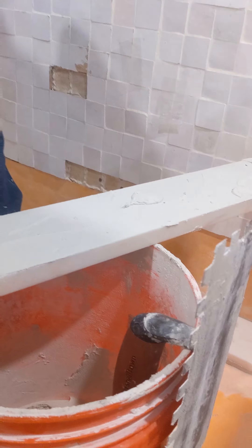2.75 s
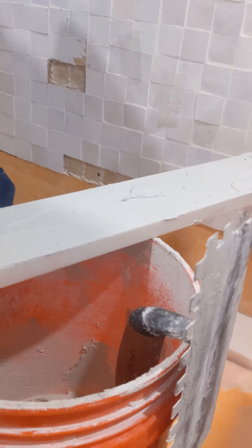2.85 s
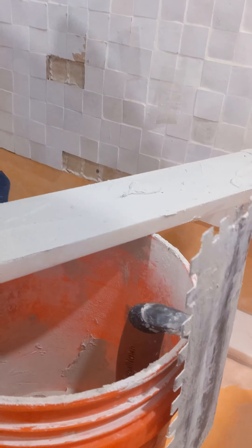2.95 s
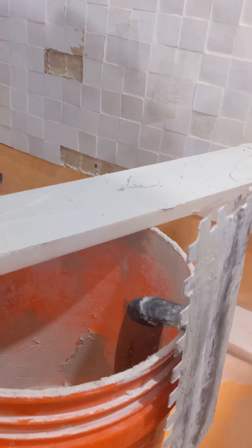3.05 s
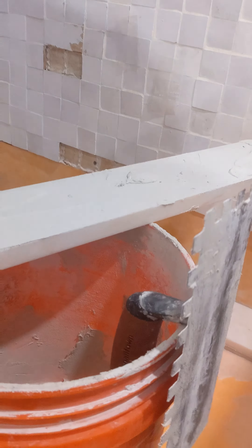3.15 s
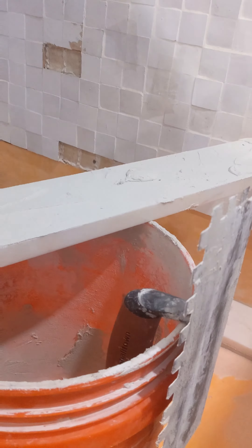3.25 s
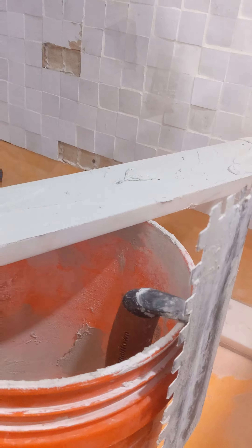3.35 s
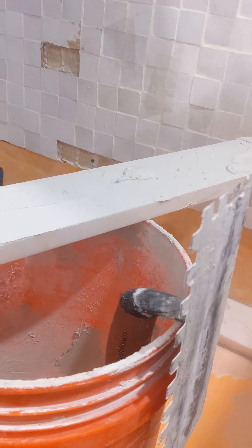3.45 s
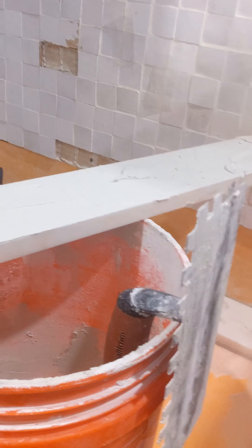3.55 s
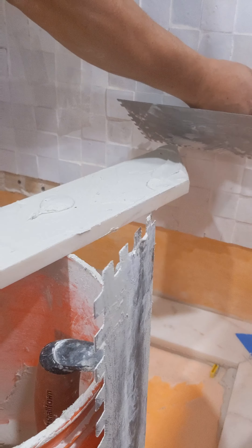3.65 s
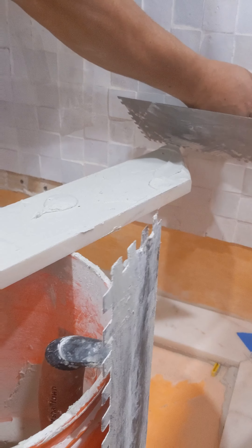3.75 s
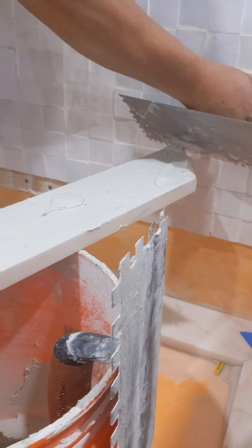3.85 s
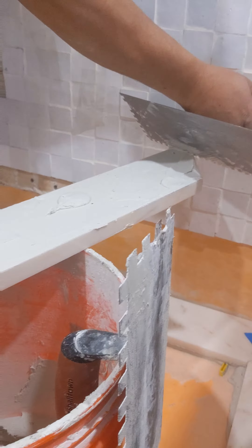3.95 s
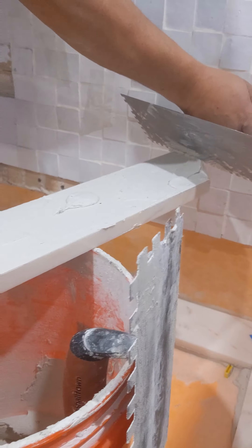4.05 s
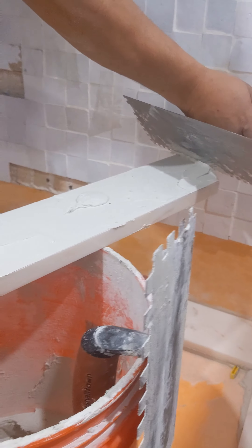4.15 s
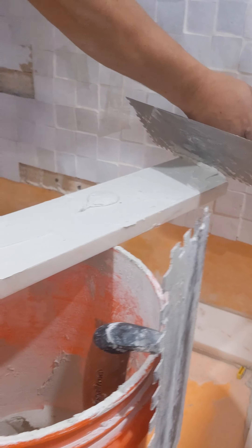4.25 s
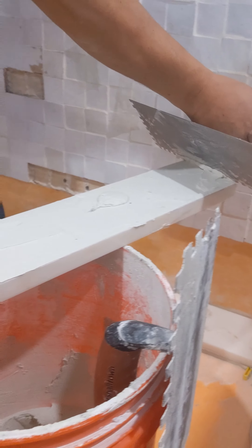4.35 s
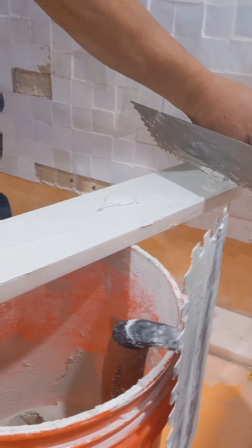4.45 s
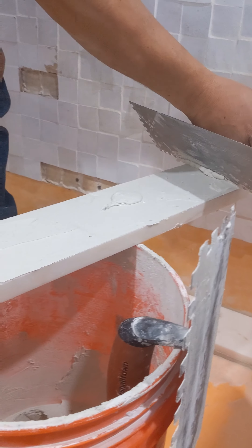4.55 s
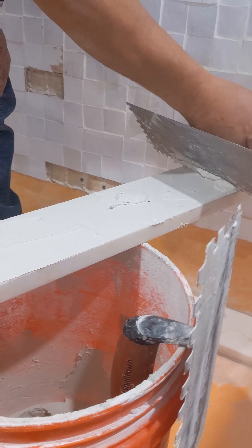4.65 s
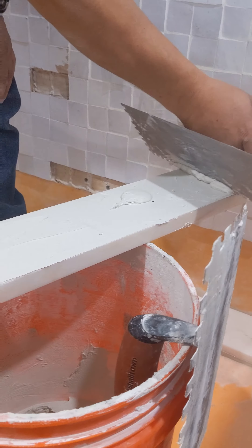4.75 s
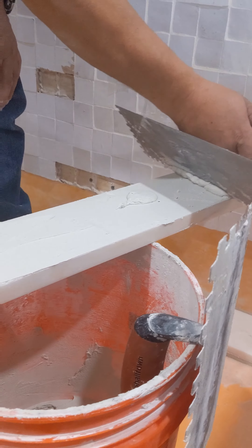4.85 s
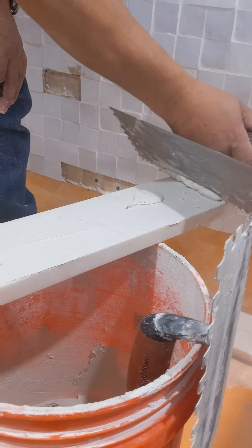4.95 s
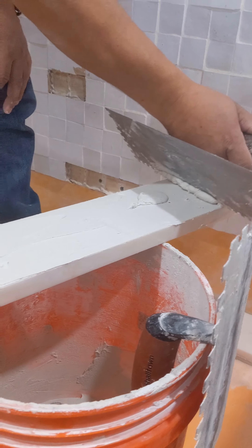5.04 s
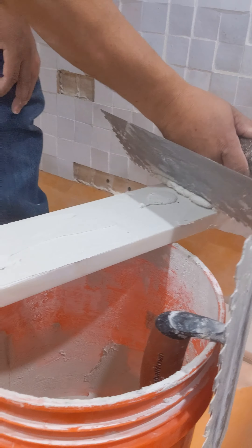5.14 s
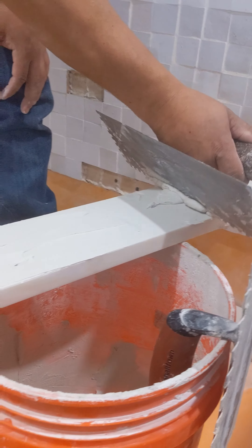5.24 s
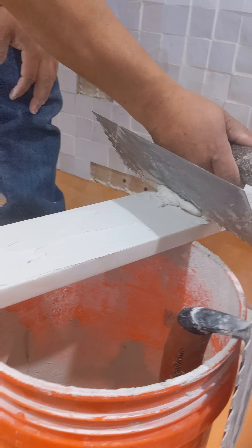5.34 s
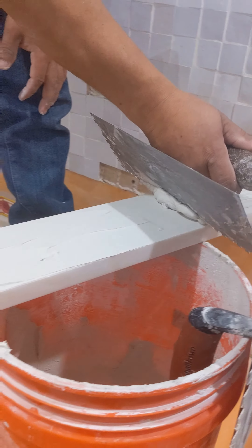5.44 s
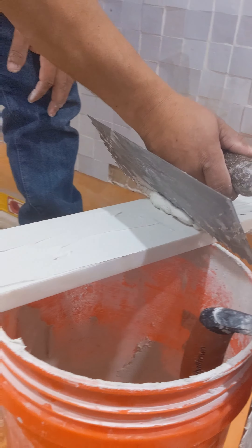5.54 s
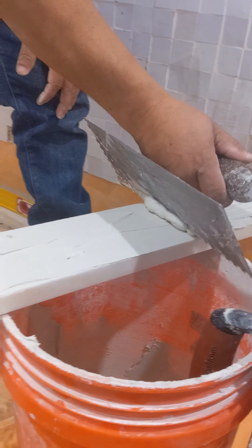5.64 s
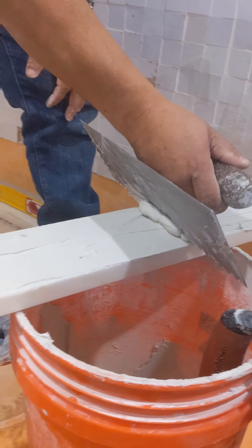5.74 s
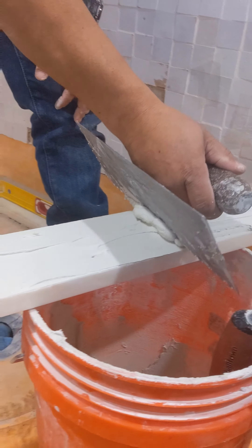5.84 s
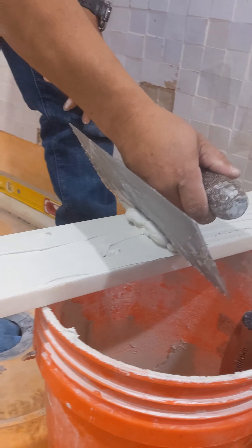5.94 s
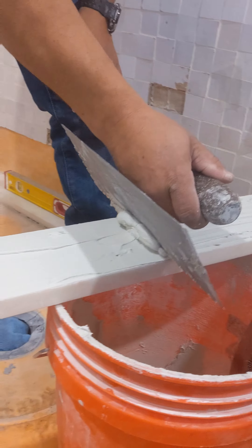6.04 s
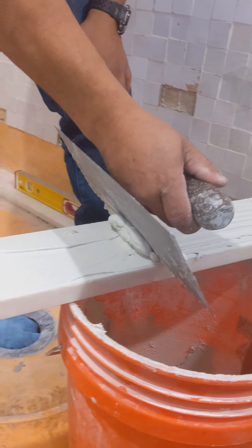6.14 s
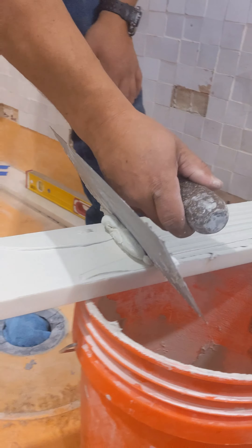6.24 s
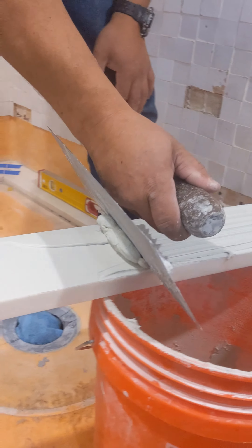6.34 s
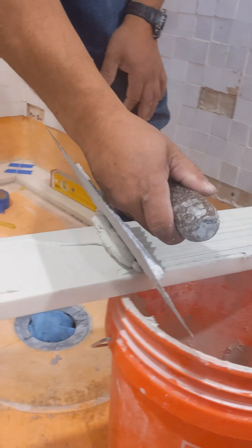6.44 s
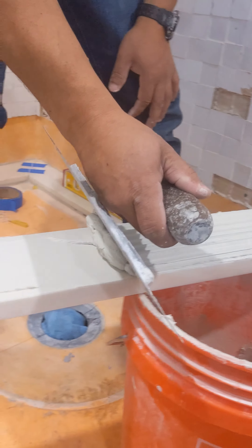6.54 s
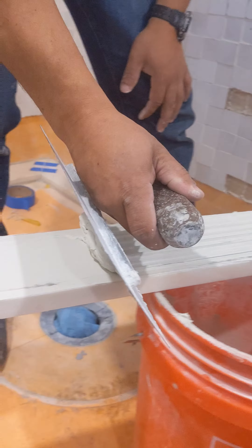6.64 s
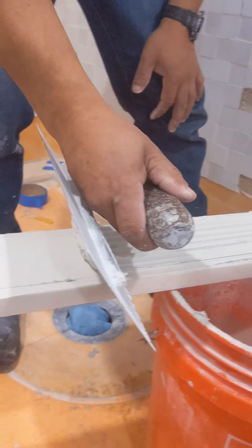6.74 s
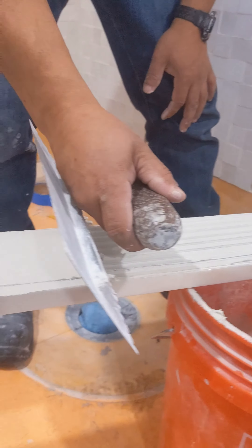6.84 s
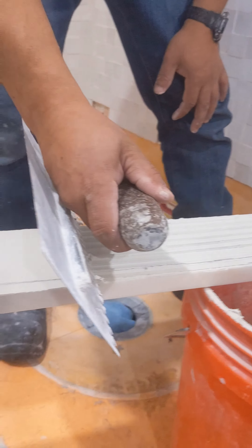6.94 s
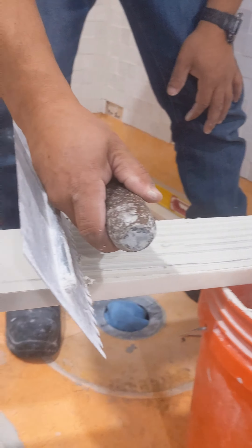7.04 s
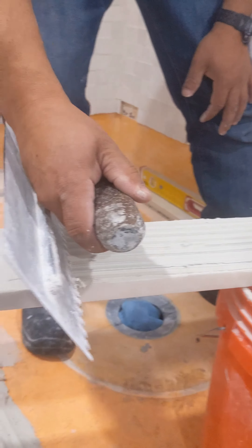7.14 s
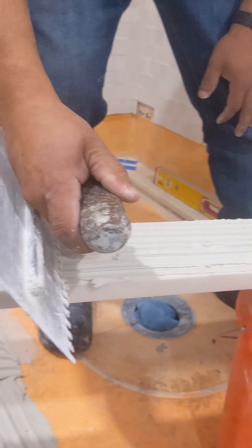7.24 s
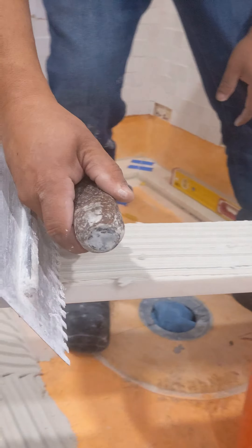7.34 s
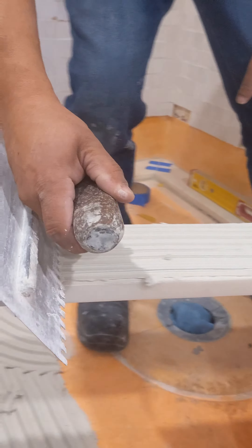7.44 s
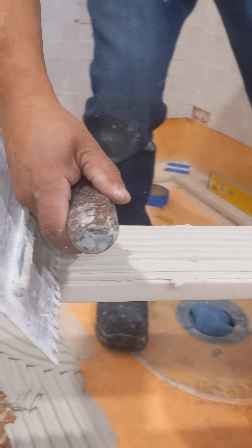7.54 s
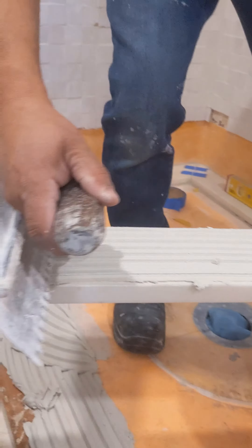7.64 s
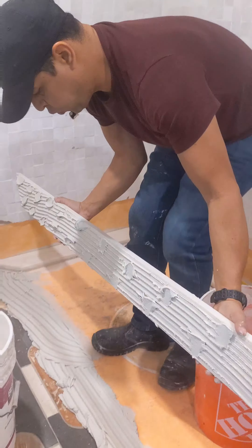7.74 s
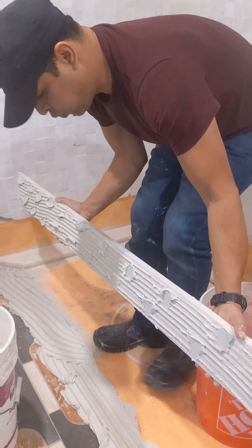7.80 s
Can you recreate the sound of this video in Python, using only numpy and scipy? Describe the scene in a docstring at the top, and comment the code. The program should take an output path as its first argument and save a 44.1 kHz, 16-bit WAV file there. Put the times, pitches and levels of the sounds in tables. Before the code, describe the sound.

A low, steady room rumble with faint hiss runs throughout, in a reflective tiled space, heard close in stereo. At 0 s a loud gritty trowel stroke is just ending, with a thin steel squeal, gone by about 0.2 s. At 0.6 s comes a sharp knock on a plastic bucket; light gritty rubs follow, and a clanking knock at 1.36 s. Around 1.95 to 2.3 s a rasping shove leads into a cluster of knocks, strongest at 2.08 s, hollow and booming, with soft rocking thuds. At 2.9 s a short rasp, squeal and thud. Near quiet follows, with a tiny dropout at 3.6 s. From 3.7 s short scrapes start a long, loud sandy pull, hissing, crunching and ringing blade and board, with brief squeals near 3.95, 5.7 and 6.9 s, smoother and hissier later. It stops dead at 7.67 s; faint rubbing, board sliding and a tiny tap at 7.97 s remain.

```python
"""Trowel and mortar in a tiled room

A steel trowel works gritty mortar: a stroke ends, tool and board knock against a plastic bucket,
then one long pull spreads mortar along the board, and the board slides lightly.
Random sand grains hiss and ring the blade and board; knocks are noise bursts and decaying tones.
Shoves rasp and squeal, light rubs are soft filtered grains, and a low rumble runs throughout."""
import sys
import numpy as np
from scipy import signal
from scipy.fft import rfft, irfft, next_fast_len
from scipy.io import wavfile
from scipy.ndimage import uniform_filter1d, map_coordinates

SR = 44100
rng = np.random.default_rng(int(sys.argv[2]) if len(sys.argv) > 2 else 0)


def file_out(sig):
    """Save sig as 16-bit WAV at sys.argv[1]."""
    # one column per channel
    cols = np.atleast_2d(sig).T
    # limit, then scale
    lim = np.clip(cols, -1, 1)
    pcm = np.round(lim * 32767).astype(np.int16)
    wavfile.write(sys.argv[1], SR, pcm)


N = 400864
TIME = np.arange(N) / SR  # seconds

# Levels in the tables are relative: each sound's function sets the final balance.
# A gesture builds for rise_s, stays for hold_s, then eases off by 20 dB in each fall_s.

# Steady background spectrum: pitch_hz, level_db
AIR_SPECTRUM = [(25, -40), (42, -9.5), (80, -12.5), (117, -1), (149, -12.5), (185, -3), (249, -8),
                (301, -10.5), (695, -16), (863, -19.5), (1040, -16), (3820, -26), (12200, -34.5),
                (16000, -37)]
# How long the room rings: pitch_hz, t60_s (time to fall by 60 dB)
ROOM_T60 = [(100, 0.62), (1400, 0.34), (4000, 0.3), (9000, 0.24), (16000, 0.24)]
CHANNEL_NULL_HZ = 1020  # diffuse sound is nearly unrelated in the two channels from here up

# Short strokes: start_s, rise_s, hold_s, fall_s, hiss_db, then relative to the hiss:
# coarse_sand_db, first_blade_db, second_blade_db, board_db
STROKES = [(0, 0.00034, 0.0078, 0.023, -10.5, -5, -17, -15, -32),
           (.025, 0.019, 0.012, 0.05, -21, 0, -3, -21, -29),
           (3.721, 0.006, 0.021, 0.11, -20.5, -4.5, 4.5, -17, -6),
           (3.828, 0.0022, 0.0033, 0.01, -11, -30, 0.5, -27, -28)]
# Long pull along the board: time_s, hiss_db, bite_db (how much the edge grinds rather than glides)
PULL = [(3.85, -23.5, -1.5), (3.99, -21.5, -0.5), (4.045, -26, 4), (4.07, -17.5, -2), (4.13, -21, 1),
        (4.37, -25, 2), (4.64, -20.5, -1), (4.88, -18.5, -1.5), (5.1, -19, 1.5), (5.12, -19, -0.5),
        (5.32, -21, 2), (5.36, -19, -2.5), (6.52, -20, -4), (6.57, -19.5, -8), (6.64, -21, -4.5),
        (6.77, -20.5, -3), (6.99, -17.5, -5), (7.39, -19, -6), (7.44, -16.5, -11), (7.59, -19, -6),
        (7.66, -16, -7.5)]
PULL_START_S, PULL_RISE_S, PULL_HOLD_S, PULL_FALL_S = 3.838, 0.005, 3.82, 0.006
PULL_DB = 1  # added to the levels in PULL
# What the bite drives; rows are coarse sand, first blade mode, second blade mode, board:
# level_db (relative to the hiss), slope_db_per_db (per dB of bite)
BITE_LAW = [(-4, 0.55), (0.5, 1.1), (-8.5, 1.07), (-6.5, 1.05)]
BED_IN_DB, BED_IN_S = -4.5, 0.32  # the edge first rides on wet paste, then beds into the sand
LEAN_DB_PER_S = -0.37  # the first blade mode fades as the trowel leans over
SWEET_S, SWEET_WIDTH_S, SWEET_DB = 5.65, 0.66, 5.5  # the angle that suits the second mode
MIDSPAN_S, MIDSPAN_WIDTH_S = 5.9, 0.54  # the trowel passes the middle of the board
MIDSPAN_RING_DB, MIDSPAN_BEND_DB = -1.5, 3.5  # there the board rings less and bends more
# Where the trowel lies: time_s, left_lag_samples
BEARING = [(0, 8.8), (4.7, 6.5), (5.7, 4.3), (6.7, 2.5), (7.6, 2.1)]
# Sand spectra: pitch_hz, level_db
FINE_SAND = [(1500, -34), (5500, -12.5), (7500, -5.5), (9800, -2.5), (11300, 1), (12800, -5), (14000, -5),
             (16000, -12)]
COARSE_SAND = [(30, -29.5), (120, -23), (500, -14), (900, -6.5), (1150, 2), (2300, -0.5), (2900, -0.5),
               (4300, 2.5), (5600, -0.5), (6700, -3), (8500, -8.5), (16000, -38.5)]
# Resonances that depend on where the edge bears: pitch_hz, width_hz, level_db, best_s (loudest moment)
BLADE_FIRST = [(1225, 85, -4, 5.6), (1285, 20, -1.5, 4.9), (1330, 20, 0.5, 5), (1432, 64, 0, 5.2),
               (3660, 400, -4.5, 2.2)]
BLADE_SECOND = [(1483, 42, -8, 6.5), (1609, 81, -2.5, 4.8), (1693, 38, -2, 6.7), (1772, 69, -4.5, 5.22),
                (2395, 130, -9, 3.9)]
BOARD = [(297, 34, -7.5, 4.0), (406, 70, -2, 7.2), (580, 75, -4, 7.6), (654, 24, 1, 4.4),
         (695, 150, 5.5, 7.12), (830, 19, 3, 3.8), (877, 96, 0.5, 5.48), (1076, 110, -0.5, 5.73)]
# High resonances of the steel: pitch_hz, width_hz, level_db
BLADE_HIGH = [(9000, 630, -5.5), (10660, 300, -5), (11540, 810, 2), (11900, 140, 1.5), (12700, 350, -4),
              (14650, 226, -4), (15270, 200, -10.5)]
# Slow bending of the board: pitch_hz, width_hz, level_db
BOARD_BENDING = [(102, 27, -8.5), (142.8, 10, 4.5), (203, 33, 2.5), (233, 18, -9), (291.5, 9.8, 3)]

# Hard, short shoves: start_s, rise_s, hold_s, fall_s, rasp_db, ring_db
SHOVES = [(1.95, 0.11, 0.03, 0.084, -19.5, -36), (2.888, 0.013, 0.016, 0.039, -21, -28),
          (2.92, 0.02, 0.028, 0.08, -36, -26)]
# Rasp spectrum of a shove: pitch_hz, level_db
SHOVE_SPECTRUM = [(150, -45), (250, 2), (282, -1.5), (698, -15), (971, -9), (1080, -17), (1280, -6.5),
                  (1610, -7.5), (2250, -11), (3000, -9.5), (4120, -15.5), (6500, -21), (11900, -24.5),
                  (16000, -30)]
# What a shove rings: pitch_hz, width_hz, level_db
SHOVE_RING = [(750, 36, -1.5), (1270, 25, -2), (1514, 20, 3), (1760, 35, -3), (2130, 20, -2.5),
              (2337, 25, -1)]
# Squeals of the steel: start_s, rise_s, hold_s, fall_s, level_db, pitch_hz
SQUEALS = [(0, .013, .066, 0.11, -30, 1308), (1.992, .077, .004, .08, -31, 1325),
           (2.908, 0.024, .022, 0.03, -18.5, 1610), (2.963, 0.022, .004, .1, -34, 1380),
           (3.955, .013, .036, .03, -22.5, 1393), (5.67, .017, .027, .03, -22, 1756),
           (6.926, .017, .012, .034, -20.5, 1690), (7.98, .037, 0.033, .05, -49, 1030),
           (8.06, .03, .04, .05, -55, 1210)]

# Light rubs and dabs of the tool: start_s, rise_s, hold_s, fall_s, level_db
RUBS = [(.547, 0.0033, 0.038, 0.0083, -42.5), (.72, 0.3, .05, 0.087, -50), (1.08, 0.095, 0.017, 0.015, -38),
        (1.306, 0.018, .003, 0.018, -30.5), (1.58, 0.049, 0.0044, .03, -37), (1.89, .002, .003, .008, -40),
        (2.53, .001, .002, .005, -39), (3.26, 0.016, 0.1, 0.045, -52.5),
        (3.374, 0.0063, 0.01, 0.089, -48.5), (7.695, 0.013, 0.27, 0.13, -41.5)]
# Spectrum of a rub: pitch_hz, level_db
RUB_SPECTRUM = [(47, -29), (80, -7.5), (203, -4.5), (802, -16), (1200, -11), (1460, -9), (2540, -12.5),
                (7530, -22), (11500, -18.5), (15000, -23.5), (16000, -46)]
# Light slides of the board as it is picked up: start_s, rise_s, hold_s, fall_s, level_db
SLIDES = [(7.695, 0.021, 0.19, 0.14, -41.5)]
# What rings as it slides: pitch_hz, width_hz, level_db
SLIDE_RING = [(335, 66, -2.5), (757, 46, -5), (1310, 120, -4), (1830, 200, -6)]

# Knocks: start_s, thud_db, thud_centre_hz, blade_ring_db, blade_ring_centre_hz,
# clack_db (hollow), clank_db (steel), tick_db, chatter_s, left_minus_right_db
KNOCKS = [(0.581, -58, 302, -47, 1200, -30, -50, -35, 0.0053, 12),
          (0.591, -18.5, 493, -30, 1150, -27, -19, -20, 0.0013, -0.5),
          (1.359, -20, 152, -31, 1500, -29.5, -16, -20.5, 0.0062, -5),
          (1.391, -34, 170, -42, 2200, -36.5, -24.5, -30, 0.058, 3),
          (1.948, -25.5, 190, -19.5, 1820, -38, -19, -24, 0.0054, 1.5),
          (1.995, -30, 290, -40, 1400, -27.5, -23, -33, 0.0097, 4),
          (2.035, -36, 110, -34, 1400, -25, -22, -39, 0.0066, 3),
          (2.078, -13.5, 250, -27, 1340, -15.5, -16, -19.5, 0.0039, 0.5),
          (2.229, -27.5, 230, -31, 1940, -28, -22, -27, 0.0057, 1),
          (2.243, -27, 105, -33, 1940, -30, -29, -30, 0.0046, 3),
          (2.323, -24, 152, -43, 1700, -45, -34.5, -38.5, 0.023, 3),
          (2.903, -32, 300, -30.5, 1500, -29.5, -29, -29, 0.0091, 11.5),
          (2.925, -22.5, 258, -31, 2200, -38, -40, -23, 0.053, 4),
          (3.83, -53, 200, -40, 1330, -41, -25.5, -24.5, 0.017, 4),
          (7.965, -39, 215, -47, 1800, -38, -50, -36, 0.021, 0)]
KNOCK_LAG = 4  # samples by which the sharp contact reaches the left channel first
# Soft thuds of the bucket rocking after a knock: start_s, level_db, centre_hz, left_minus_right_db
ROCKS = [(2.134, -15.5, 210, 0), (2.176, -18, 120, 3), (2.262, -22.5, 149, 1.5), (2.953, -22.5, 240, 1)]
# Bucket and board ringing together: pitch_hz, level_db, t60_s
BODY = [(86, 0.5, 0.23), (101, 3, 0.12), (119.4, -2, 0.18), (150.6, 5, 0.15), (200.8, 1, 0.2),
        (244.6, -3, 0.13), (295.6, -4.5, 0.29), (409, -22, 0.16), (468, -15.5, 0.41), (657, -11.5, 0.29),
        (796, -4, 0.2)]
# The struck steel blade: pitch_hz, level_db, t60_s
BLADE_STRUCK = [(1120, -4, .22), (1265, -7.5, .2), (1504, -2.5, 0.22), (1620, -2.5, .11), (1744, 2.5, .09),
                (1927, -1.5, .11), (2130, -4, .09), (2350, -10, .14)]
# Colours of a knock: pitch_hz, level_db
CLACK = [(120, -28), (380, -0.5), (463, -4), (560, -2.5), (700, -2.5), (786, 4.5), (900, -7), (1150, -5),
         (1600, -14), (5000, -48)]
CLANK = [(500, -8), (1000, 0), (1500, 6.5), (1900, 5), (2400, -1.5), (3200, 2.5), (3900, -11.5),
         (8000, -35)]
TICK = [(1500, -2.5), (3500, 0), (5500, -2), (7500, -5.5), (11500, -3.5), (14000, -12), (16000, -23)]

# The sound drops out briefly: start_s, end_s, fade_s
DROPOUTS = [(3.604, 3.701, 0.0083), (7.67, 7.686, 0.024)]
TOP_HZ = 15550  # the treble is cut steeply above this


def undb(db):
    """Turn decibels into a plain gain."""
    return 10 ** (np.asarray(db) / 20)


def unit(x):
    """Scale to an rms level of 1."""
    return x / np.sqrt(np.mean(x ** 2))


def on_log(hz, points):
    """Read (pitch, value) points on a log-frequency axis."""
    f, value = np.transpose(points)
    return np.interp(np.log(np.maximum(hz, 1)), np.log(f), value)


def colour(x, points, size=4096):
    """Filter with the given spectrum; it never sounds early and its response has energy 1."""
    gain = undb(on_log(np.fft.rfftfreq(size, 1 / SR), points))
    # folding the cepstrum makes the filter minimum phase
    cepstrum = irfft(np.log(gain))
    cepstrum[1:size // 2] *= 2
    cepstrum[size // 2 + 1:] = 0
    response = irfft(np.exp(rfft(cepstrum)))
    return signal.oaconvolve(x, response / np.linalg.norm(response))[:len(x)]


def ring(x, modes):
    """Drive a set of resonances, each at its own level and with alternating sign."""
    total = 0
    for k, (hz, width, db) in enumerate(modes):
        tone = unit(signal.lfilter(*signal.iirpeak(hz, hz / width, SR), x))
        total = total + (-1) ** k * undb(db) * tone
    return unit(total)


def walk(rate):
    """Wander between random values, `rate` new ones a second, with an rms of 1."""
    knots = rng.standard_normal(4096)
    return unit(np.interp(TIME * rate, np.arange(len(knots)), knots))


def gesture(start, rise, hold, fall):
    """Gain of a touch that builds, holds and eases off."""
    age = TIME - start
    return np.clip(age / rise, 0, 1) ** 2 * undb(-20 * np.clip((age - rise - hold) / fall, 0, 10))


def touches(rows):
    """Summed gain of a table of gestures."""
    return sum(undb(db) * gesture(*timing) for *timing, db in rows)


def passing(centre, width):
    """A smooth bump in time, 1 at its centre."""
    return np.exp(-((TIME - centre) / width) ** 2)


def follow(rows, column):
    """One column of a table, joined by straight lines in time."""
    rows = np.array(rows)
    return np.interp(TIME, rows[:, 0], rows[:, column])


def diffuse(size):
    """Noise from all directions: partly alike in the bass, nearly unrelated in the treble."""
    likeness = 0.8 * np.sinc(np.fft.rfftfreq(size, 1 / SR) / CHANNEL_NULL_HZ)
    mid, side = (irfft(rfft(rng.standard_normal(size)) * np.sqrt((1 + sign * likeness) / 2), size)
                 for sign in (1, -1))
    return np.array([mid + side, mid - side])


def tiled_room(first_s=0.0027, early_db=-11, size=24000, count=3):
    """A few early bounces off board and tiles, then dense reflections that die sooner in the treble."""
    hz, t, cells = signal.stft(diffuse(size), SR, nperseg=256)
    t60 = on_log(hz, ROOM_T60)[:, None]
    decay = np.exp(-np.log(1000) * t / t60) / np.sqrt(t60)
    tail = signal.istft(cells * decay, SR)[1]
    # silent until first_s, then fading in
    tail *= np.clip(np.arange(tail.shape[1]) / SR / first_s - 1, 0, 1)
    tail /= np.linalg.norm(tail, axis=1, keepdims=True)
    for lag in rng.integers(60, 400, count):  # samples
        tail[[0, 1], lag + rng.integers(0, 16, 2)] += undb(early_db)
    return tail / np.linalg.norm(tail, axis=1, keepdims=True)


def place(x, room, wet_db):
    """Mix direct sound with its room echo, keeping the power."""
    direct = np.broadcast_to(x, (2, N))
    wet = signal.oaconvolve(direct, room, axes=1)[:, :N]
    return (direct + undb(wet_db) * wet) / np.hypot(1, undb(wet_db))


def roving(x, wet_db):
    """A moving source: the pattern of reflections, and so the colour, keeps changing."""
    out = np.zeros((2, N + 2 * SR))
    step_s = 0.07  # overlapping pieces, each with a fresh room response
    for centre in np.arange(0, 8.3, step_s):
        a, b = max(int((centre - step_s) * SR), 0), int((centre + step_s) * SR)
        part = x[a:b] * np.cos(np.pi / 2 * (TIME[a:b] - centre) / step_s)
        if np.abs(part).max() > 1e-4:
            wet = signal.fftconvolve(part[None], tiled_room(size=12288), axes=1)
            out[:, a:a + wet.shape[1]] += wet
    left = map_coordinates(x, [np.arange(N) - follow(BEARING, column=1)], order=3)
    direct = np.array([left, x])
    return (direct + undb(wet_db) * out[:, :N]) / np.hypot(1, undb(wet_db))


def grit(spread_db, share=0.25):
    """Sand grains snapping past the edge: many small, a few large."""
    at = np.flatnonzero(rng.random(N) < share)  # share of samples that hold a grain
    size_db = spread_db * np.minimum(rng.exponential(size=len(at)), 6)
    grains = np.zeros(N)
    grains[at] = rng.choice([-1, 1], len(at)) * undb(size_db)
    return unit(grains)


def room_air():
    """A steady low rumble with a faint hiss, made of filtered noise that wavers a little."""
    air = np.array([colour(side, AIR_SPECTRUM) for side in diffuse(next_fast_len(N))[:, :N]])
    waver_db = 0.5 * walk(6)
    return unit(air) * undb(-47 + waver_db)


def short_strokes():
    """Drives of fine sand, coarse sand, two blade modes and board, in strokes of steady grip."""
    drives = 0
    for s, rise, hold, fall, db, *grip in STROKES:
        levels = undb(db + np.array([0, *grip]))
        drives = drives + np.outer(levels, gesture(s, rise, hold, fall))
    return drives


def long_pull():
    """The same five drives, changing with bite and angle as the trowel travels the board."""
    force = gesture(PULL_START_S, PULL_RISE_S, PULL_HOLD_S, PULL_FALL_S)
    force = force * undb(PULL_DB + follow(PULL, column=1))
    bite, age = follow(PULL, column=2), np.maximum(TIME - PULL_START_S, 0)
    coarse, first, second, board = (db + slope * bite for db, slope in BITE_LAW)
    paste = BED_IN_DB * np.exp(-age / BED_IN_S)
    coarse = coarse + paste
    first = first + LEAN_DB_PER_S * age
    second = second + 2 * paste + SWEET_DB * passing(SWEET_S, SWEET_WIDTH_S)
    board = board + MIDSPAN_RING_DB * passing(MIDSPAN_S, MIDSPAN_WIDTH_S)
    return force * undb([np.zeros(N), coarse, first, second, board])


def patchy(x, patchy_db, size=512, count=3):
    """The points of contact keep changing, so narrow bands of the scrape flicker on their own."""
    cells = signal.stft(x, SR, nperseg=size)[2]
    flicker = uniform_filter1d(rng.standard_normal(cells.shape), count, axis=0)
    flicker = unit(uniform_filter1d(flicker, count, axis=1))
    return unit(signal.istft(cells * undb(patchy_db * flicker), SR)[1][:N])


def swept_ring(x, modes, swing_db, span_s, drift):
    """Each resonance swells as the edge passes its best spot; all wander slightly in pitch at random."""
    out = 0
    for k, (hz, width, db, best_s) in enumerate(modes):
        swell_db = swing_db * (passing(best_s, span_s) - 1)
        out = out + (-1) ** k * undb(db + swell_db) * ring(x, [(hz, width, 0)])
    out = out / np.linalg.norm(undb([mode[2] for mode in modes]))
    # reading slightly fast or slow shifts the pitch
    return np.interp(TIME + np.cumsum(drift * walk(9)) / SR, TIME, out)


def trowel(room):
    """The edge crushes sand, which hisses and rings the steel blade and the board under it."""
    fine, *grinding = long_pull() + short_strokes()
    lumps = walk(45)  # lumps in the mortar jolt the grinding more than the hiss
    fine = fine * undb(0.31 * lumps)
    coarse, first, second, board = np.array(grinding) * undb(0.35 * lumps)
    # slips come at uneven moments and shake fine and coarse sand together
    shake = undb(0.97 * walk(140))

    fine_scrape = patchy(colour(grit(spread_db=3, share=0.06), FINE_SAND), patchy_db=3)
    steel_hiss = ring(grit(spread_db=5), BLADE_HIGH)
    hiss = fine * (undb(0.5) * fine_scrape + undb(-0.5) * steel_hiss)
    crunch = patchy(colour(grit(spread_db=3.5, share=0.03), COARSE_SAND), patchy_db=2.2)
    rasp = undb(2.5) * coarse * crunch

    first_ring = swept_ring(grit(spread_db=2.5), BLADE_FIRST, swing_db=2, span_s=0.89, drift=0.005)
    second_ring = swept_ring(grit(spread_db=3.5), BLADE_SECOND, swing_db=3, span_s=0.62, drift=0.004005)
    blade = undb(-1) * first * first_ring + undb(7) * second * second_ring

    bending = np.sqrt(fine * board) * undb(MIDSPAN_BEND_DB * passing(MIDSPAN_S, MIDSPAN_WIDTH_S))
    board_ring = swept_ring(grit(spread_db=3, share=0.08), BOARD,
                            swing_db=7.5, span_s=0.96, drift=0.00395)
    wood = undb(3.5) * board * board_ring
    wood = wood + undb(-17.5) * bending * ring(grit(spread_db=3), BOARD_BENDING)
    # keep the deep bass out of the board's ring
    wood = signal.sosfilt(signal.butter(4, 90, "high", fs=SR, output="sos"), wood)

    # sand leans to the left, blade to the right (dB per channel)
    sand = roving(shake * (hiss + rasp), wet_db=7.5) * undb([[0.7], [-0.7]])
    steel = roving(blade, wet_db=7) * undb([[-0.6], [0.6]])
    return sand + steel + place(wood, room, wet_db=1)


def drags(room):
    """Steel shoved over a rough edge rasps and squeals at a ragged pitch."""
    grains = grit(spread_db=3.5, share=0.05)
    ring_gain = touches([(*timing, db) for *timing, _, db in SHOVES])
    partials = ring_gain * ring(grains, SHOVE_RING)
    rasp_gain = touches([row[:-1] for row in SHOVES])
    rasp = rasp_gain * colour(grains * undb(2.2 * walk(200)), SHOVE_SPECTRUM)
    ragged = walk(150) + 1j * walk(150)  # random wobble of strength and phase
    squeal = 0
    for s, rise, hold, fall, db, hz in SQUEALS:
        tone = np.real(ragged * np.exp(1j * 2 * np.pi * hz * TIME))
        squeal = squeal + undb(db) * gesture(s, rise, hold, fall) * tone
    rough = place(undb(1) * rasp, room, wet_db=5)
    return rough + place(undb(2.5) * squeal + partials, room, wet_db=-4)


def rubs(room):
    """Grains colour light wipes of the tool through wet mortar, and ring the sliding board."""
    grains = grit(spread_db=2.5)
    wipe = touches(RUBS) * colour(grains * undb(0.98 * walk(97)), RUB_SPECTRUM)
    slide = touches(SLIDES) * ring(grit(spread_db=3, share=0.05), SLIDE_RING)
    return place(undb(2) * wipe + slide, room, wet_db=4.5)


def blows(levels_db, spectrum, stretch, snap_db, size=4096):
    """Every knock as a sharp contact and a short burst of chatter, in one colour."""
    out, t = np.zeros((2, N + size)), np.arange(size) / SR
    for (s, *_, chatter_s, pan_db), db in zip(KNOCKS, levels_db):
        burst = diffuse(size) * np.exp(-t / (chatter_s * stretch))
        burst /= np.linalg.norm(burst, axis=1, keepdims=True)
        burst[[0, 1], [0, KNOCK_LAG]] += undb(snap_db)
        start = int(s * SR)
        sides_db = np.array([[pan_db], [-pan_db]]) / 2
        out[:, start:start + size] += unit(burst) * undb(db + sides_db)
    return np.array([colour(side, spectrum)[:N] for side in out])


def struck(modes, hits, reach_octaves, swell_s, side_radians, size=24000):
    """Ring an object with blows; each blow's centre pitch decides which modes take it up."""
    out, t = np.zeros((2, N + size)), np.arange(size) / SR
    hz, db, t60 = np.transpose(modes)[:, :, None]
    # each mode arrives from its own side
    side_phase = side_radians * rng.choice([-1, 1], hz.shape) * np.array([1, -1])[:, None, None]
    decay = np.exp(-np.log(1000) * t / t60) * (1 - np.exp(-t / swell_s))
    for s, hit_db, centre_hz, pan_db in hits:
        weight = undb(db) / (1 + (np.log2(hz / centre_hz) / reach_octaves) ** 4)
        # every blow detunes the modes a little
        mode_hz = hz * (1 + 0.0093 * rng.standard_normal(hz.shape))
        phase = 2 * np.pi * (mode_hz * t + rng.random(hz.shape))
        tone = np.sum(weight * decay * np.sin(phase + side_phase), axis=1)
        start = int(s * SR)
        sides_db = np.array([[pan_db], [-pan_db]]) / 2
        out[:, start:start + size] += unit(tone) * undb(hit_db - 12 + sides_db)
    return out[:, :N]


def knocks(room):
    """Tool and board strike the bucket: boom, blade ring, hollow clack, steel clank and tick."""
    (s, thud_db, thud_hz, ring_db, ring_hz,
     clack_db, clank_db, tick_db, _, pan_db) = np.transpose(KNOCKS)
    clack = blows(clack_db - 6.5, CLACK, stretch=3.1, snap_db=-20)
    clank = blows(clank_db - 7.5, CLANK, stretch=1.8, snap_db=-17)
    tick = blows(tick_db - 8.5, TICK, stretch=0.95, snap_db=-29.5)
    thuds = [*zip(s, thud_db, thud_hz, pan_db), *ROCKS]
    boom = struck(BODY, thuds, reach_octaves=0.85, swell_s=0.0024, side_radians=0.33)
    boom = signal.sosfilt(signal.butter(2, 62, "high", fs=SR, output="sos"), boom)
    steel = struck(BLADE_STRUCK, zip(s, ring_db, ring_hz, pan_db),
                   reach_octaves=0.25, swell_s=0.0008, side_radians=0.77)
    contact = place(clack, room, wet_db=9) + place(clank + tick, room, wet_db=-3)
    return contact + place(steel, room, wet_db=-9.5) + place(boom, room, wet_db=-9)


def scene():
    """Mix all the work in one room; the long pull and its echo stop dead at the second dropout."""
    room = tiled_room()
    _, end, fade = DROPOUTS[-1]
    heard = np.clip((end - TIME) / fade, 0, 1)
    return room_air() + heard * trowel(room) + drags(room) + rubs(room) + knocks(room)


def record(dry):
    """Two brief dropouts, the microphone's bass roll-off, full-scale clipping and a steep top cut."""
    for start, end, fade in DROPOUTS:
        dry = dry * np.clip(np.maximum(start - TIME, TIME - end) / fade, 0, 1) ** 2
    dry = signal.sosfilt(signal.butter(3, 40, "high", fs=SR, output="sos"), dry)
    top_cut = signal.ellip(10, 0.05, 60, TOP_HZ, fs=SR, output="sos")
    return signal.sosfiltfilt(top_cut, np.clip(dry, -1, 1))


dry = scene()
out = record(dry)
file_out(out)
```